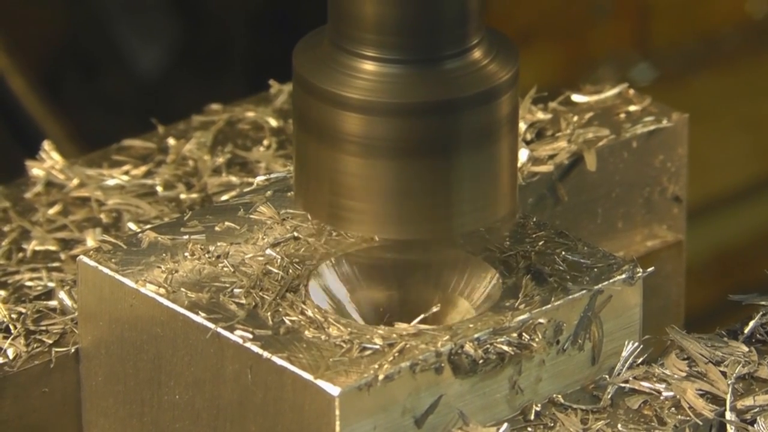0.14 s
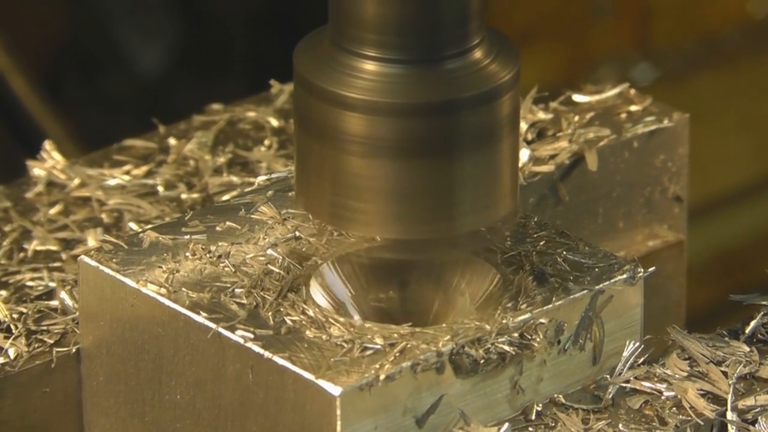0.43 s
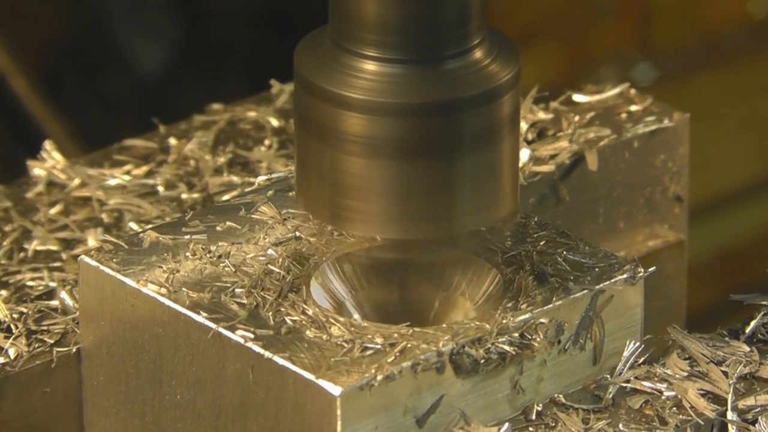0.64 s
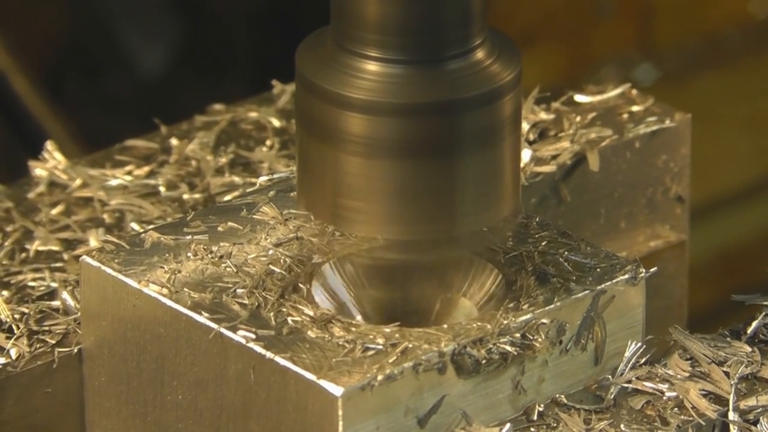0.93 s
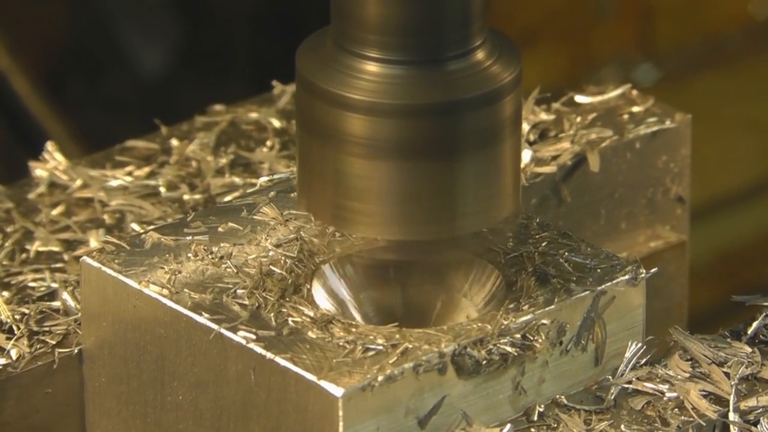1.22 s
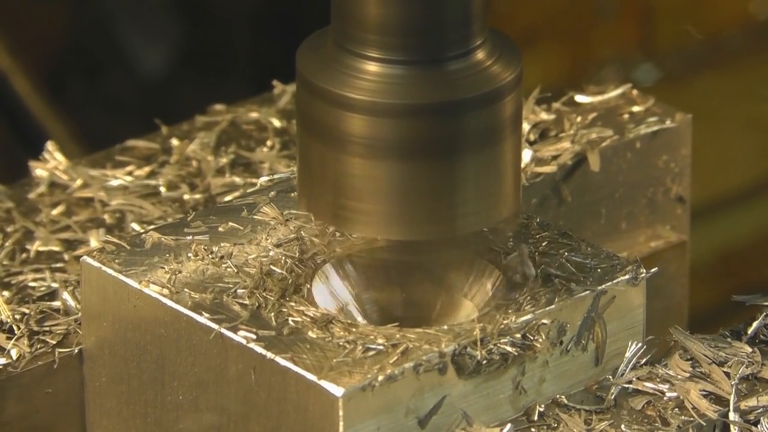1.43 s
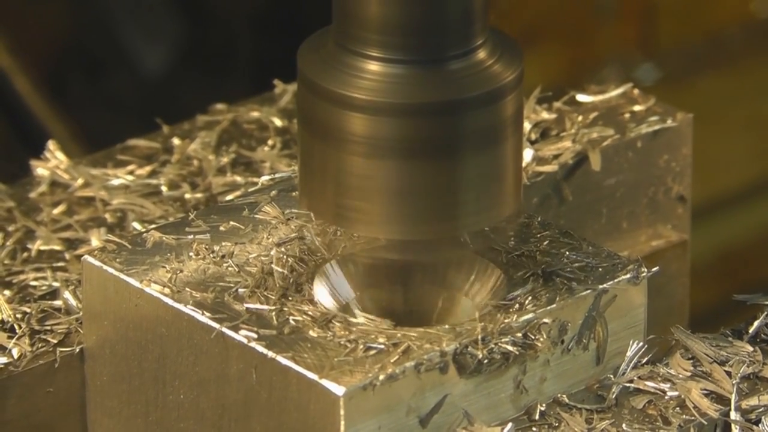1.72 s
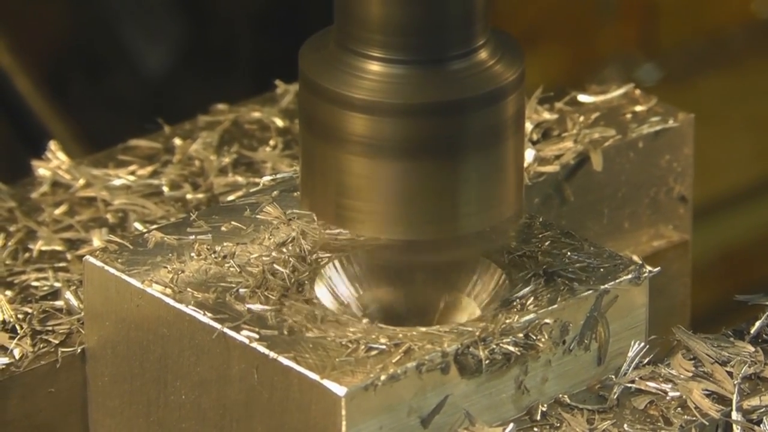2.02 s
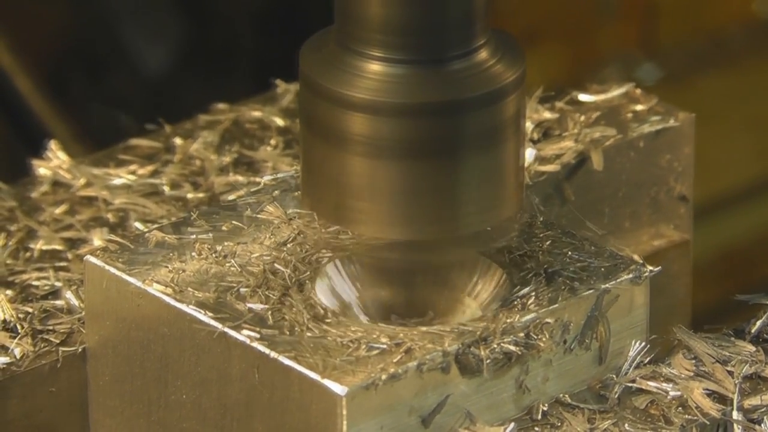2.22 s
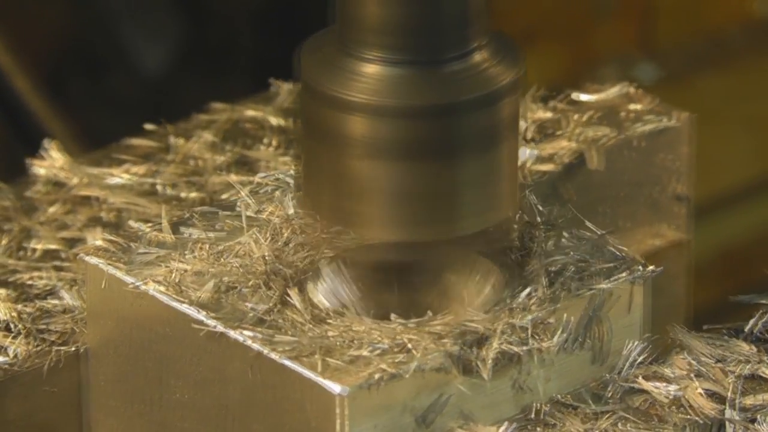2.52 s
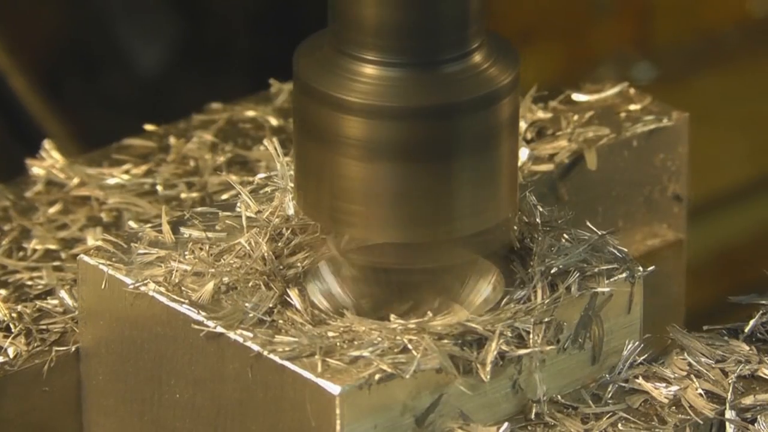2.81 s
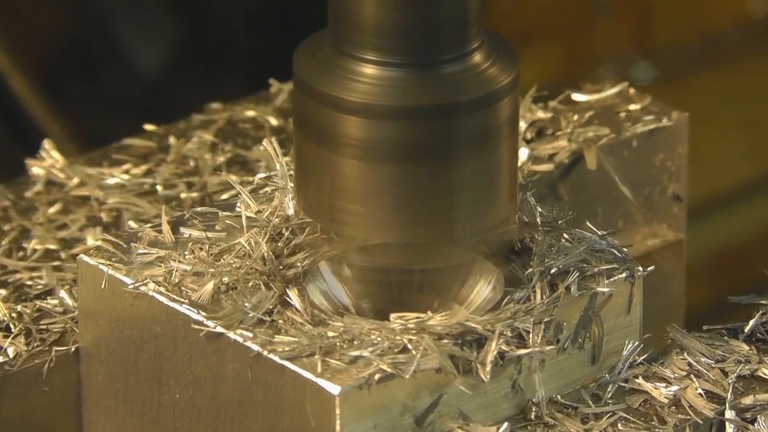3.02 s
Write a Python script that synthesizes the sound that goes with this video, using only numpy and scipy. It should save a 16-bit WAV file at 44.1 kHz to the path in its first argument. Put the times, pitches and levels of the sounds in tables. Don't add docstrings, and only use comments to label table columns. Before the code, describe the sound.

A milling cutter scrapes metal in rapid pulsing bites, ringing and chattering over a low hum.

```python
import sys
import numpy as np
from scipy import signal
from scipy.io import wavfile

SR = 44100
rng = np.random.default_rng(int(sys.argv[2]) if len(sys.argv) > 2 else 0)


def invert_db(level):
    return 10 ** (np.asarray(level, dtype=float) / 20)


def dump(signal):
    limited = np.clip(np.atleast_2d(signal).T, -1, 1)
    pcm = np.round(limited * 32767).astype(np.int16)
    wavfile.write(sys.argv[1], SR, pcm)


N = 138915

SPINDLE_HZ = 19.19
# (time [s], once-a-turn swell [dB], its place [turns], twice-a-turn swell [dB], its place [turns])
BITE_SWELL = [
    (0, 2.5, 0.38, -1.3, 0.032),
    (.4, 4, 0.55, 0, .07),
    (.9, 2, 0.42, 0, 0.057),
    (1.3, 1.5, 0.24, 1, 0.24),
    (1.55, 0.9, 0.22, 3, 0.14),
    (1.95, 1, 0.1, 3.5, 0.21),
    (2.25, 0.7, 0.15, 3.5, 0.17),
    (2.45, 0.5, .03, 2.2, 0.16),
    (2.75, 0.45, 0.14, -0.7, 0.28),
    (3.15, 1.5, 0.12, -1.5, .08),
]
BITE_SKEW, BITE_SPREAD_DB, FLICKER_DB = 0.56, 1.5, 1.5
# (frequency [Hz], share [1])
BITE_SHARE = [(300, 0.01), (800, 0.073), (1500, 0.27), (3000, 0.63), (6000, 0.91), (12000, 0.91)]
# (time [s], surge [dB])
CHIP_SNAPS = [(0.025, 5.5), (0.079, 6), (0.13, -2), (0.18, 1.5), (0.219, 4), (0.238, 1), (0.287, 6),
              (0.341, 0.5), (0.39, 3), (0.447, 4.5), (0.583, 5), (0.603, 4), (0.653, 5.5), (0.706, 3.5),
              (0.757, 3), (0.806, 3.0), (0.86, 3.5), (1.015, 3.5), (1.058, 1.5), (1.217, 0), (1.266, -4),
              (1.321, 0), (1.475, 4.0), (1.517, 5), (1.546, 3), (1.569, 1.5), (1.6, 5), (1.623, 2.5),
              (1.652, 4.0), (1.673, 3.5), (1.703, 3), (1.755, 5), (1.807, 6), (1.834, 3.5), (1.885, 0),
              (1.914, 5), (1.938, 2.5), (1.966, 6), (2.069, 4.5), (2.147, 3), (2.173, 6.0), (2.281, 5),
              (2.557, 0), (2.676, 3.5), (2.923, 6), (2.995, 4), (3.024, 2.5), (3.074, 3.5), (3.131, 4.5)]
SNAP_RISE_S, SNAP_FALL_S, SNAP_ABOVE_DB, SNAP_GAIN = 0.0022, 0.0026, 1, 1.56
# (time [s], level [dB])
CUT_DEPTH = [
    (0.1, -30.5),
    (0.17, -29),
    (0.28, -31.5),
    (1.31, -32),
    (1.67, -30.5),
    (3.14, -30.5),
    (3.15, -30),
]
# (time [s], level [dB])
DRIVE = [
    (0, -35),
    (.9, -32),
    (1.15, -29.5),
    (1.5, -30),
    (1.6, -35),
    (2.75, -36.5),
    (3.0, -41.5),
    (3.15, -45),
]
DRIVE_TOP_HZ, LOW_FOLLOWS = 2100, 0.56
# (frequency [Hz], density [dB per Hz])
SCRAPE_LOW = [(260, -17.5), (450, -13), (540, -11), (885, 2), (988, -1), (1160, -2), (2170, -5), (2680, -2),
              (4000, -19.5), (5200, -59), (8800, -120)]
# (frequency [Hz], density [dB per Hz])
SCRAPE_HIGH = [(2500, -43), (4000, -6), (4800, -4.5), (7400, -1), (8800, -10.5), (11400, -17.5),
               (14000, -22), (17000, -27)]
LOW_DB, HIGH_DB, PATCHY_DB = 10, -6.0, 1.14
# (frequency [Hz], width [Hz], level [dB])
CUT_MODES = [(811, 122, -6), (1086, 80, -7), (1170, 80, -2.5), (1367.5, 24, -2), (1577, 102, -4.5),
             (1718, 49, -4), (2013, 44, -6), (2338, 28, -5), (2442, 41, -2), (2667, 49, -2),
             (2832, 79, -9), (3032, 31, -9.5), (3286, 97, -8), (3650, 93, -15),
             (4220, 167, -16), (5235, 74, -23), (5630, 99, -21.5), (6250, 165, -23.5), (7400, 430, -20.5),
             (10500, 330, -31), (11380, 340, -30.5)]
MODES_DB, MODE_WANDER_DB = 10.5, 1.0
# (time [s], level [dB], frequency [Hz])
TOOL_RINGS = [(0.025, -27, 2590), (0.081, -13, 2440), (0.132, -14, 2490), (0.172, -13, 2620),
              (0.239, -12, 2550), (0.29, -11, 2530), (0.342, -15, 2550), (0.394, -18, 2550),
              (0.448, -10.5, 2520), (0.489, -33, 2610), (0.552, -20, 2570), (0.583, -13, 2650),
              (0.656, -11, 2560), (0.709, -15, 2480), (0.758, -15, 2510), (0.806, -24, 2630),
              (0.862, -11.5, 2540), (0.907, -22, 2640), (1.008, -18, 2620), (1.059, -14, 2560),
              (1.114, -11, 2570), (1.177, -15, 2560), (1.217, -17, 2500), (1.266, -14, 2480),
              (2.543, -45, 2660), (2.558, -16, 2420), (2.595, -16, 2820), (2.62, -17, 2690),
              (2.665, -24, 2430), (2.677, -20, 2720), (2.701, -17, 2710), (2.757, -15, 2720),
              (2.786, -26, 2710), (2.815, -14, 2730), (2.834, -13, 2700), (2.854, -25.5, 2670),
              (2.915, -30, 2740), (2.924, -23, 2470), (2.995, -17, 2670), (3.023, -17, 2740),
              (3.028, -15, 2430), (3.075, -17, 2410), (3.094, -23, 2710), (3.116, -21, 2700),
              (3.133, -26, 2430)]
TOOL_S, TOOL_DB, UPPER_RATIO, UPPER_DB = .013, -2.5, 1.307, -8.5
# (time [s], level [dB], frequency [Hz])
HOLDER_RINGS = [(1.558, -16, 1180), (1.577, -17, 1170), (1.603, -14, 1180), (1.621, -14, 1143),
                (1.655, -14.5, 1180), (1.676, -13, 1170), (1.707, -11, 1186), (1.73, -14.5, 1190),
                (1.76, -12, 1183), (1.781, -15.5, 1170), (1.812, -9.5, 1183), (1.835, -14, 1170),
                (1.863, -12.5, 1180), (1.887, -14, 1150), (1.918, -14.5, 1150), (1.941, -16, 1190),
                (1.97, -19, 1200), (1.993, -18, 1180)]
HOLDER_S, HOLDER_DB, HOLDER_HZ = .027, -1.5, 1169
# (start [s], length [s], frequency [Hz], level [dB], share of the bite swing [1])
CHATTER = [
    (1.33, .32, 1379, -24.5, .7),
    (1.88, .58, 1056, -30.5, .9),
    (1.83, .21, 2690, -31, 1),
    (2.55, .7, 2690, -33, .8),
]
CHATTER_RISE_S, CHATTER_WIDTH_HZ, CHATTER_WANDER_DB, WIDTH_GROWS = .12, 4.0, 1.6, 3.2
LEFT_LEAD_RAD = 0.37
# (multiple of the turn, level [dB])
GEAR_LINES = [(37, -11), (40, -5), (41, 0), (42, -6), (43, -4), (44, -2.5), (45, -4.5), (46, -10), (47, -9),
              (48, -7), (55, -10), (83, -9), (89, -11)]
# (time [s], level [dB], knock place [turns], tilt [dB per multiple], gap between knocks [turns])
GEAR_LOAD = [
    (0, -27, .5, 0.4, .33),
    (.3, -32.5, 0.51, 0.5, .33),
    (1.3, -30.5, .52, 0.39, 0.34),
    (1.6, -38, 0.48, 0.25, 0.36),
    (1.9, -45, 0.45, 1, 0.37),
    (2.3, -36.5, 0.11, 0.8, 0),
    (2.6, -32.5, .12, 1.5, 0.024),
    (3.15, -24.5, 0.117, -1.2, 0),
]
GEAR_CENTRE, GEAR_WANDER_DB, GEAR_WOBBLE_RAD, GEAR_PAN_DB = 41, 1.7, .4, -4
WIDE_GAP_TURNS, ODD_DB, ODD_LAG_TURNS = .33, -3.5, .13
# (time [s], level [dB])
CHIP_TAPS = [
    (.128, -60),
    (.24, -62),
    (.452, -60),
    (.61, -58),
    (.659, -45),
    (.862, -52),
    (1.135, -59),
    (1.57, -57),
    (2.17, -54),
    (2.55, -62),
]
TAP_HZ, TAP_DB, TAP_FAR_SIDE = 90, 29, -.85
# (time [s], level [dB])
HUM = [
    (0.0, -44),
    (0.13, -41.5),
    (1.15, -38),
    (1.97, -45.5),
    (2.1, -40),
    (2.89, -55),
    (3.08, -47),
    (3.15, -49.5),
]
# (frequency [Hz], level against the hum [dB])
HUM_LINES = [(120, 1), (139.2, -7), (240, -38), (259.2, -12), (360, -20)]
HUM_PAN_DB = -7
# (frequency [Hz], density [dB per Hz])
SHOP = [(15, -66), (25, -38), (65, -28), (89, -25), (113, -6.5), (205, -10.5), (330, -3.5), (530, -19),
        (700, -7), (910, -28), (1540, -120)]
SHOP_DB, SHOP_FOLLOWS = -33.5, 0.73
# (frequency [Hz], left-right correlation [1])
LIKENESS = [(40, 2), (100, -0.72), (400, 0.19), (740, 0.36), (1200, 0.35), (2000, 0.73), (3300, 0.84),
            (5500, 1.9), (8000, 0.57), (15000, 0.25)]
# (frequency [Hz], left minus right [dB])
BALANCE = [(40, 3), (130, 0.5), (290, -4), (640, -2), (1410, 0), (3100, -2), (6820, 0.0), (15000, 4)]
CLIP_TOP, CUTOFF_HZ = 1.16, 15770


def scrape(swing_db):
    depth_db, = in_time(CUT_DEPTH)
    low_drive_db = LOW_FOLLOWS * drive_db()
    ringing = 0
    for hz, width_hz, db in CUT_MODES:
        level_db = at_hz(BITE_SHARE, hz) * swing_db + MODE_WANDER_DB * drift(1.4)
        if hz < DRIVE_TOP_HZ:
            level_db = level_db + low_drive_db
        force = rng.standard_normal((2, N)) * invert_db(level_db)
        ringing = ringing + invert_db(db) * spread(resonate(force, hz, width_hz), hz)
    low = invert_db(LOW_DB + low_drive_db) * banded(SCRAPE_LOW, swing_db, PATCHY_DB)
    high = invert_db(HIGH_DB) * banded(SCRAPE_HIGH, swing_db, PATCHY_DB)
    return invert_db(depth_db) * (low + high + invert_db(MODES_DB) * rms_one(ringing))


def bite():
    once_db, once_at, twice_db, twice_at = in_time(BITE_SWELL)
    turn = np.arange(N) * SPINDLE_HZ / SR
    once = 2 * np.pi * (turn - once_at)
    twice = 4 * np.pi * (turn - twice_at)
    skewed = twice + BITE_SKEW * (np.cos(twice) - 1)
    swell_db = once_db * np.cos(once) + twice_db * np.cos(skewed)
    return snap() + swell_db * invert_db(BITE_SPREAD_DB * drift(5.8)) + FLICKER_DB * drift(85.0)


def snap():
    t = np.arange(N) / SR
    surge_db = 0
    for s, db in CHIP_SNAPS:
        width_s = np.where(t < s, SNAP_RISE_S, SNAP_FALL_S)
        surge_db = surge_db + (db - SNAP_ABOVE_DB) * np.exp(-((t - s) / width_s) ** 2 / 2)
    return SNAP_GAIN * surge_db


def drive_db():
    level_db, = in_time(DRIVE)
    return level_db - level_db.mean()


def tool_rings():
    main = rings(TOOL_RINGS, TOOL_S, TOOL_DB, 0.95)
    upper = rings(TOOL_RINGS, TOOL_S, TOOL_DB + UPPER_DB, 1, UPPER_RATIO)
    return main + upper


def holder_rings():
    return rings(HOLDER_RINGS, HOLDER_S, HOLDER_DB, .25)


def rings(rows, length_s, gain_db, scatter_cycles, ratio=1.0):
    t = np.arange(N) / SR
    out = 0
    for (s, db, hz), chance in zip(rows, rng.random(len(rows))):
        shape = np.cos(np.pi * np.clip((t - s) / length_s, -.5, .5)) ** 2
        cycles = ratio * hz * (t - s) + HOLDER_HZ * s + scatter_cycles * chance
        out = out + invert_db(db + gain_db) * shape * np.sin(2 * np.pi * cycles + [[LEFT_LEAD_RAD], [0]])
    return out


def chatter(swing_db):
    t = np.arange(N) / SR
    out = 0
    for s, length_s, hz, db, swing in CHATTER:
        shape = np.clip(np.minimum(t - s, s + length_s - t) / CHATTER_RISE_S, 0, 1)
        width_hz = CHATTER_WIDTH_HZ * (hz / 1200) ** WIDTH_GROWS
        phase = 2 * np.pi * np.cumsum(hz + width_hz * drift(25.5)) / SR
        level_db = db + swing * swing_db + CHATTER_WANDER_DB * hz / 1200 * drift(37.0)
        out = out + invert_db(level_db) * shape * np.sqrt(2) * np.sin(phase + [[LEFT_LEAD_RAD], [0]])
    return out


def gears():
    load_db, place, tilt_db, gap = in_time(GEAR_LOAD)
    turn = np.arange(N) * SPINDLE_HZ / SR
    closeness = np.clip(1 - gap / WIDE_GAP_TURNS, 0, 1)
    out = 0
    for multiple, db in GEAR_LINES:
        off = multiple - GEAR_CENTRE
        sign = np.clip(3 * np.cos(np.pi * off * gap), -1, 1)
        odd = closeness * (off % 2)
        turns = multiple * turn - off * place - np.sign(off) * odd * ODD_LAG_TURNS
        phase = 2 * np.pi * turns + GEAR_WOBBLE_RAD * drift(3.3)
        level_db = db + min(abs(off), 8) * tilt_db + odd * ODD_DB + GEAR_WANDER_DB * drift(4.3)
        out = out + sign * invert_db(level_db) * np.sin(phase)
    return np.sqrt(2) * invert_db(load_db) * out * pan(GEAR_PAN_DB)


def taps():
    s, db = np.transpose(CHIP_TAPS)
    clicks = np.zeros(N) + 1e-18
    clicks[(s * SR).astype(int)] = invert_db(db + TAP_DB)
    r = np.exp(-2 * np.pi * TAP_HZ / SR)
    push = signal.lfilter([np.e * (1 - r)], [1, -2 * r, r * r], clicks)
    return push * [[-1], [-TAP_FAR_SIDE]]


def motor():
    t = np.arange(N) / SR
    hum_db, = in_time(HUM)
    mono = 0
    for hz, db in HUM_LINES:
        phase = 2 * np.pi * (hz * t + rng.random()) + 0.063 * drift(3.3)
        mono = mono + invert_db(db + 0.53 * drift(1.1)) * np.sin(phase)
    return invert_db(hum_db) * np.sqrt(2) * mono * pan(HUM_PAN_DB)


def shop():
    return invert_db(SHOP_DB + SHOP_FOLLOWS * drive_db()) * banded(SHOP, 0, 1.6)


def banded(spectrum, swing_db, patchy_db):
    low_hz, high_hz = spectrum[0][0], min(spectrum[-1][0], .45 * SR)
    edges = np.geomspace(low_hz, high_hz, int(2.5 * np.log2(high_hz / low_hz)) + 2)
    white = rng.standard_normal((2, 2, N))
    out = 0
    for k, (low, high) in enumerate(zip(edges, edges[1:])):
        hz = np.sqrt(low * high)
        band = signal.butter(2, [low, high], "band", fs=SR, output="sos")
        pair = signal.sosfilt(band, white[k % 2])
        level_db = at_hz(spectrum, hz) + at_hz(BITE_SHARE, hz) * swing_db + patchy_db * drift(14.0)
        out = out + invert_db(level_db) * spread(pair, hz)
    return rms_one(out)


def resonate(x, hz, width_hz):
    r = np.exp(-np.pi * width_hz / SR)
    poles = [1, -2 * r * np.cos(2 * np.pi * hz / SR), r * r]
    return signal.lfilter([(1 - r * r) / 2, 0, (r * r - 1) / 2], poles, x)


def spread(pair, hz):
    alike = np.clip(at_hz(LIKENESS, hz), -.99, .99)
    mid = np.sqrt(1 + alike) * pair[0]
    side = np.sqrt(1 - alike) * pair[1]
    return (mid + side * [[1], [-1]]) * pan(at_hz(BALANCE, hz))


def pan(db):
    return invert_db([[db / 2], [-db / 2]])


def drift(rate_hz):
    r = np.exp(-80 * np.pi * rate_hz / SR)
    noise = rng.standard_normal(N // 40 + 2002)
    slow = signal.lfilter([1], [1, -2 * r, r * r], noise)[2000:]
    return np.interp(np.arange(N) / 40, np.arange(len(slow)), rms_one(slow))


def rms_one(x):
    return x / np.sqrt(np.mean(x ** 2) + 1e-20)


def in_time(rows):
    s, *columns = np.transpose(rows)
    return [np.interp(np.arange(N) / SR, s, c) for c in columns]


def at_hz(points, hz):
    table_hz, values = np.transpose(points)
    return np.interp(np.log(hz), np.log(table_hz), values)


def scene():
    swing_db = bite()
    cut = scrape(swing_db) + tool_rings() + holder_rings() + chatter(swing_db)
    return cut + gears() + taps() + motor() + shop()


def top_cut(x):
    return signal.sosfilt(signal.butter(12, 16390, fs=SR, output="sos"), x)


def record(dry):
    soft = CLIP_TOP * np.tanh(dry / CLIP_TOP)
    low_pass = signal.ellip(14, .5, 60, CUTOFF_HZ, fs=SR, output="sos")
    mix = signal.sosfilt(low_pass, soft)
    return top_cut(mix)


dry = scene()
out = record(dry)
dump(out)
```